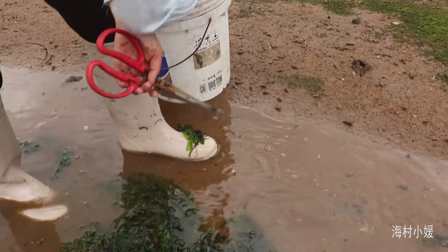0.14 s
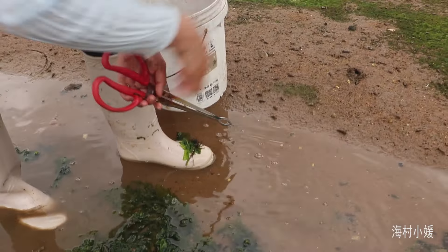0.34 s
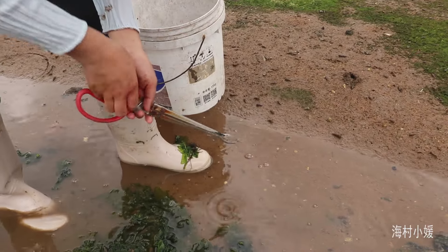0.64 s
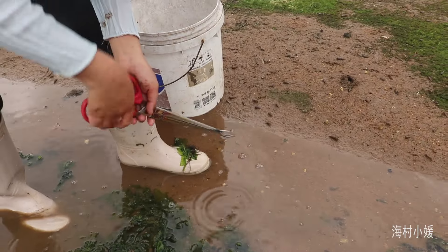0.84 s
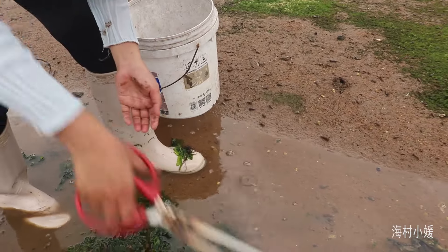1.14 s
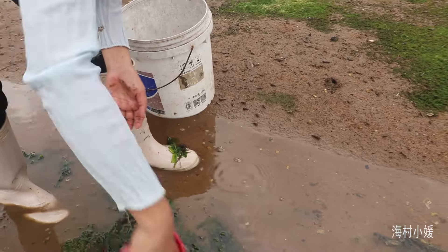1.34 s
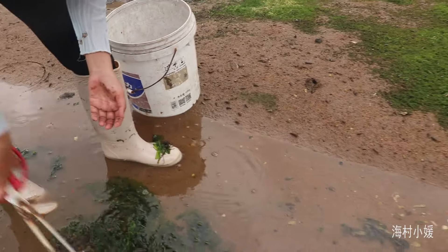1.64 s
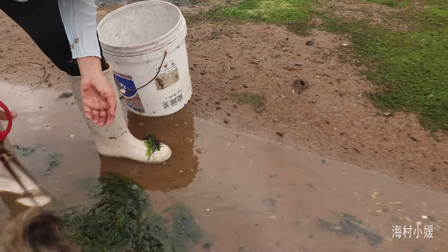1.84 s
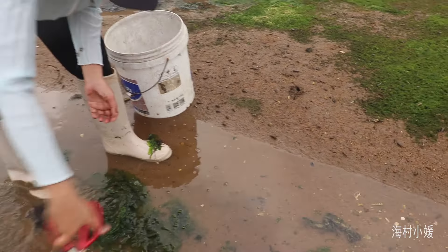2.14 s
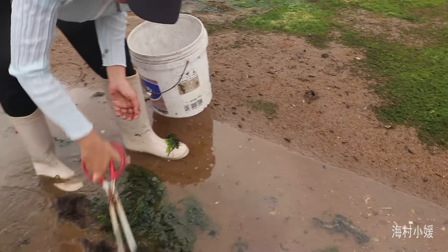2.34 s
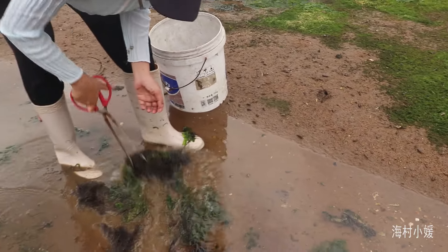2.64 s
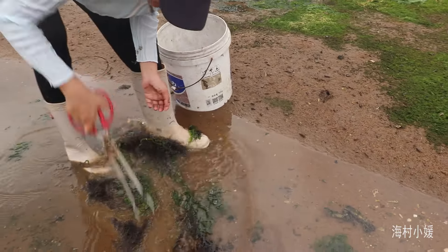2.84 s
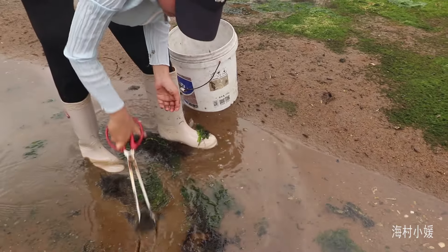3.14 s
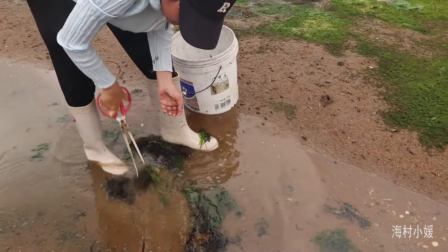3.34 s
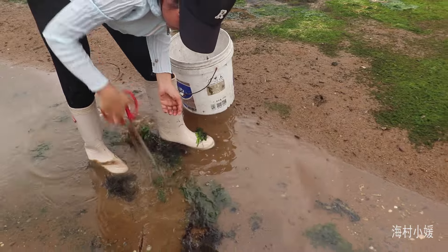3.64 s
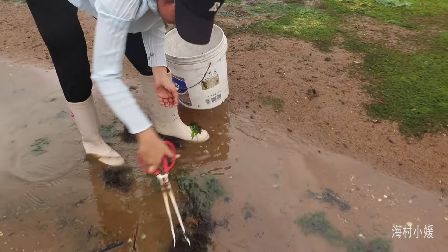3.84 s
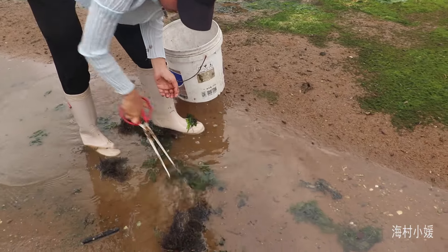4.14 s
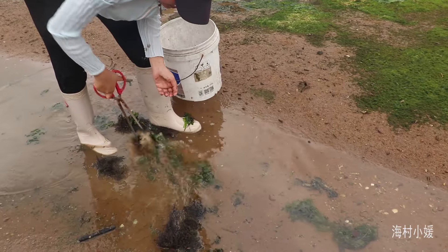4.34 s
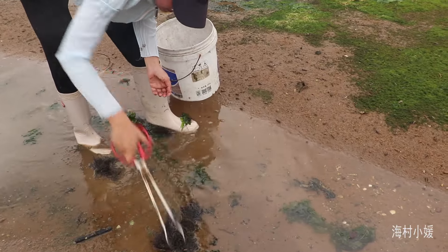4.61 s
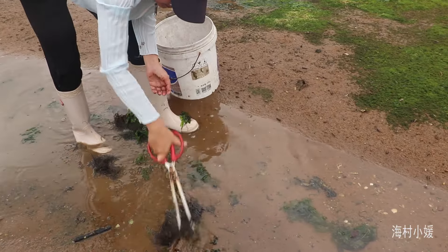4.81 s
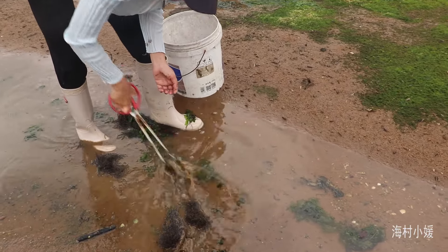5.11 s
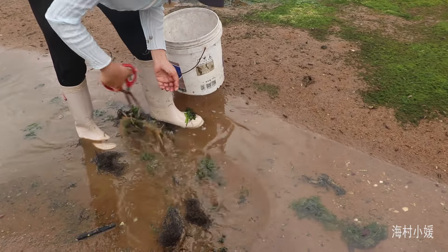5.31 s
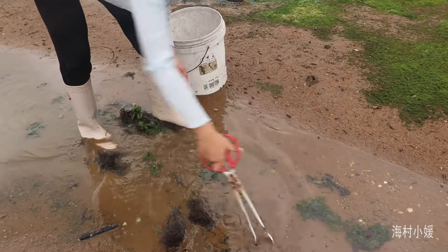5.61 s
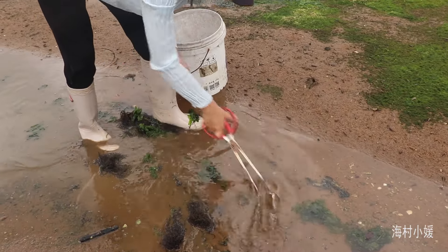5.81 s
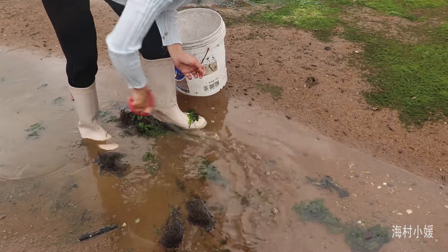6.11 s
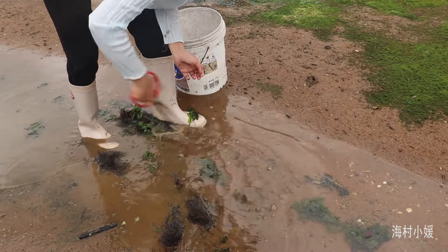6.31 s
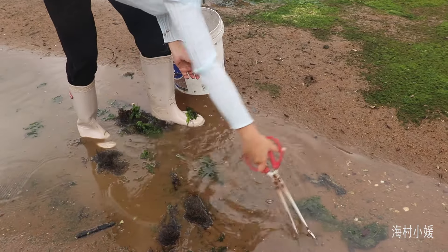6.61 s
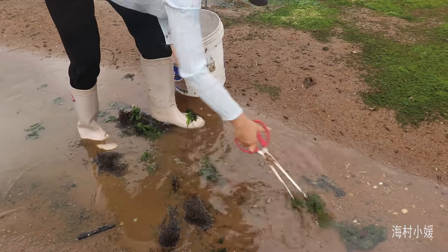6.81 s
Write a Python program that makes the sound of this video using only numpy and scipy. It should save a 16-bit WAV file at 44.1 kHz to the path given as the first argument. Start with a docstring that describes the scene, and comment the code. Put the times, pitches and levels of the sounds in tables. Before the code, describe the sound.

Hollow plastic knocks and a sharp metal clatter, then repeated watery swishes with bubbles, drips and fine spray over faint surf and thudding wind.

```python
"""Steel tongs rake seaweed through a shallow puddle on a tidal flat, stroke after stroke: crowds of gliding tones
make the bubbles, filtered noise the rush, bursts of clicks the spray, and a ringing tone the dragged steel.
Single bubbles and drips stand out. Before the raking, small shells knock a plastic bucket and the tongs clack:
short noise bursts set fixed tones ringing. Behind it lie far surf and a light wind thudding on the microphone,
both made of shaped noise."""
import sys
import numpy as np
from scipy import signal
from scipy.fft import rfft, irfft
from scipy.io import wavfile

SR = 44100
rng = np.random.default_rng(int(sys.argv[2]) if len(sys.argv) > 2 else 0)


def wrap_up_sound(samples):
    """Save the sound to the file named by the first command line argument, as 16-bit audio."""
    columns = np.atleast_2d(samples).T
    # keep every value between -1 and 1, then stretch to whole-number steps
    tamed = np.clip(columns, -1, 1)
    steps = np.round(tamed * 32767).astype(np.int16)
    wavfile.write(sys.argv[1], SR, steps)


N = 306936   # length in samples
HZ = np.maximum(np.fft.rfftfreq(N, 1 / SR), 1)   # frequencies of the whole-scene spectrum

# Levels in the tables are relative: each source trims them further.
# Tone of the far surf: (frequency [Hz], gain [dB])
SURF_COLOUR = [(120, -22), (200, -5.5), (366, -0.5), (1710, -5), (4520, -9), (11700, -12.5), (15100, -20),
               (16000, -10)]
SURF_DB = -51
# Strength of the wind on the microphone: (time [s], level [dB])
WIND_LEVEL = [(0.0, -49.5), (0.62, -46.5), (1.29, -53), (1.4, -42.5), (2.06, -41), (2.28, -49.5),
              (2.39, -38.5), (2.5, -65.5), (2.67, -42.5), (3.1, -65.5), (3.33, -50.5), (3.86, -52.5),
              (3.96, -46), (4.74, -46), (4.9, -36), (5.03, -58), (5.25, -51), (5.38, -62), (5.49, -46),
              (5.8, -56.5), (6.11, -42.5), (6.19, -52.5), (6.96, -51.5)]
# Tone of the wind: (frequency [Hz], gain [dB])
WIND_COLOUR = [(15, -47), (25, -21.5), (91, 1), (167, -1), (240, -5), (430, -19), (518, -24.5), (600, -25),
               (780, -56), (1320, -120)]
# Shells hitting the bucket: (time [s], level [dB], brightness [dB], depth [dB])
SHELL_HITS = [(0.074, 1, -9, -5), (0.079, -10, -0.5, 14.5), (0.108, -6, -6.5, -11),
              (0.157, -5.5, -0.5, -11), (0.162, -7.5, -15, 5), (0.167, -16, 5, 22), (0.2, -7, 2.5, -29),
              (0.215, -5, -4.5, 4.5), (0.23, -12.5, -12, 17), (0.271, -16, -12, 11.5),
              (0.36, -24, -14, 15.5), (0.396, -29.5, 0, 12), (0.436, -20, -11, 5), (0.477, -21.5, -17, 8),
              (0.693, -30.5, 11.5, -15), (0.797, -29.5, -8, 16), (0.83, -26, -16, 11), (1.335, -22, -14, 8),
              (1.347, -28.5, -4, -10), (1.361, -29, -13, 9)]
# Tones the bucket wall rings with: (frequency [Hz], level [dB], time to fade by 60 dB [s])
BUCKET_MODES = [(238, -17, 0.15), (506, -6.5, 0.07), (790, -7.5, 0.18), (1063, -13, 0.11),
                (1350, 0.5, 0.021), (1560, 6, 0.025), (1814, 2.5, 0.017), (2554, -3, 0.028),
                (2870, -11, 0.027), (4300, -4.5, 0.0058)]
# Shells sliding along the bucket floor: (time [s], level [dB])
SHELL_SLIDE = [(0.495, -54), (0.53, -36.5), (0.6, -39.5), (0.66, -41.5), (0.67, -48)]
# Tongs clacking and bouncing: (time [s], level [dB])
TONG_CLACKS = [(0.5619, -18.5), (0.5752, -18), (0.7228, -36), (0.8485, -20), (0.8701, -7.5), (0.8867, -15),
               (0.8977, -18.5), (0.9044, -26), (0.9116, -26.5), (0.9242, -30), (0.929, -26.5),
               (0.9411, -30), (0.9871, -25), (0.9928, -18.5), (0.9954, -18.5), (1.0043, -27),
               (1.2764, -27.5)]
# Tones the tongs ring with: (frequency [Hz], level [dB], time to fade by 60 dB [s])
TONG_MODES = [(2530, -3, 0.014), (6320, 3, 0.019), (7930, 13.5, 0.013), (11630, 1.5, 0.036),
              (13500, 8, 0.0076)]
# Bubbles that stand out: (time when loudest [s], level [dB], pitch when loudest [Hz], length [s],
# upward glide [octaves per s])
SINGLE_BUBBLES = [(3.547, -33, 1470, 0.013, 23), (4.217, -33.5, 1195, 0.009, 1),
                  (4.257, -30, 1380.0, 0.0096, -7.0), (4.381, -26.5, 882, 0.0089, -1),
                  (4.449, -30, 1460.0, 0.008, -4), (4.532, -40, 835, 0.013, 10.0),
                  (4.541, -32.5, 1386, 0.02, 20), (5.024, -29.5, 2050, 0.016, -5),
                  (5.22, -28, 1530.0, 0.0071, -8), (5.253, -31, 2550, 0.027, 7.5),
                  (5.81, -33, 2700, 0.0088, 11), (5.844, -26.5, 1375, 0.012, -31),
                  (5.939, -31, 930, 0.008, 8.0), (6.031, -19.0, 2580, 0.015, 2.5),
                  (6.104, -33, 1030, 0.022, 13), (6.159, -34, 2590, 0.019, -6.5),
                  (6.204, -25, 1250, 0.014, 15), (6.261, -27.5, 1014, 0.0096, 17),
                  (6.28, -34, 1220, 0.018, -4), (6.825, -34.0, 1860, 0.005, -9.0),
                  (6.831, -36, 1440, 0.015, -8)]
# Drips and slaps on the surface: (start time [s], level [dB], plop pitch when loudest [Hz])
DRIPS = [(1.654, -18, 2460), (1.766, -22, 1720), (1.844, -20.5, 1430), (2.195, -23, 2300),
         (2.583, -15.5, 2000), (2.638, -13, 2440), (2.671, -23, 1090), (2.797, -24.5, 1090),
         (3.419, -25, 960), (3.712, -15, 1220), (4.017, -24, 3450), (4.301, -28.5, 1470),
         (4.337, -22, 2560), (4.4, -18, 2570), (4.474, -18, 3800), (4.522, -23, 850), (4.936, -11, 3520),
         (5.099, -11.5, 1280), (5.151, -18, 1400), (5.281, -10.5, 1520), (5.344, -16.5, 1610),
         (5.367, -20, 3080), (5.395, -17, 2200), (5.403, -22, 2330), (5.461, -20, 2300), (5.48, -19, 3230),
         (5.494, -21.5, 1630), (5.523, -26, 1690), (5.81, -25, 2870), (5.996, -17, 3900),
         (6.713, -13, 3550), (6.821, -27, 1440)]
# Raking strokes: (time [s], fizz level [dB], bubbling above fizz [dB], spray above fizz [dB])
RAKE_STROKES = [(1.392, -86, 10, -5), (1.422, -37, -26, 9.5), (1.442, -43, -5, -2),
                (1.512, -36, -14.5, 5.5), (1.871, -42.5, 2.5, 2), (1.901, -59.5, 7.5, 9),
                (2.03, -42, -3.5, 7.5), (2.05, -46, -3, 4), (2.16, -49.5, -7, 5.5), (2.2, -35.5, -20, -3),
                (2.24, -55, 2, 13.5), (2.31, -30, -11.5, 1), (2.33, -42, -2.5, 3.5), (2.539, -37, -2.5, -2),
                (2.679, -43, 8.5, 0.5), (2.988, -57.5, 2, 2), (2.998, -49.5, 0, 9), (3.048, -49, -9, 0),
                (3.088, -44.5, -5.5, 7), (3.228, -27, -15.5, -1.5), (3.567, -44, 6.5, 3.5),
                (3.677, -42, -8, -5), (3.717, -40, 7, 7), (3.816, -61.5, -8, -9), (3.916, -66, -9, -1),
                (3.936, -46.5, -17, 9.5), (3.976, -62, -4, 10), (4.016, -29, -30, -3),
                (4.066, -29.5, -7, 0), (4.405, -43.5, -3, 9), (4.425, -51, 8, 3), (4.525, -39, 4, -5),
                (4.615, -53, -1, 2.5), (4.684, -49, -25, 4.5), (4.704, -75, -4, 2), (4.764, -68, -6, 12),
                (4.814, -35, -31, -3), (4.834, -53, -15, -4), (4.854, -41, -10, 6),
                (4.964, -26.5, -13.5, 1.5), (5.353, -43, 5, 2), (5.493, -38, -8, 0), (5.562, -65, 3, 2),
                (5.692, -70, -8, 13), (5.712, -51.5, 3.5, 18.5), (5.762, -63, 6, 10), (5.802, -30, -3, 0),
                (6.011, -31.5, -7, 6), (6.071, -35, -3.5, 3.5), (6.251, -30.5, -8, 6.5), (6.39, -52, 7, 3),
                (6.49, -50, 0, 10), (6.5, -75, -3, 1), (6.66, -76, 0, 9), (6.71, -36, -4, 3.5),
                (6.75, -61, -10, 3), (6.77, -38.5, -9, 1.5), (6.829, -36, 5, 5), (6.869, -46.5, 4, 6.5),
                (6.959, -39, -5, 2.5)]
# Singing of the steel while its tips drag on sand: (time [s], level above spray [dB])
STEEL_DRAG = [(1.4, -7), (1.7, -12), (1.8, 13), (2.0, -8.5), (2.4, 8), (2.9, -8.5), (3.2, 3), (3.7, -8.5),
              (4.2, -4), (5.5, -7.5), (5.85, 5.5), (6.3, -18), (6.9, 1.5)]
# Tone of the stirred water: (frequency [Hz], gain [dB])
WATER_COLOUR = [(180, -52), (300, -35.5), (1320, -9.5), (2360, -9), (2610, -11), (3080, -9.5), (10200, -4),
                (11500, -4), (16000, -5.5)]
# Tone of the water arriving from the other side: (frequency [Hz], gain [dB])
OTHER_SIDE_COLOUR = [(1000, -5), (8000, -1.5)]
# Difference between the two microphones: (frequency [Hz], left minus right [dB])
MIC_BALANCE = [(60, 4.5), (180, -2), (550, 1.5), (1650, -3), (4970, -1), (15000, 3.5)]


def amp(db):
    """Turn decibels into a gain."""
    return 10 ** (np.asarray(db) / 20)


def rms_one(x):
    """Scale a sound so that its average strength (rms) is 1."""
    return x / np.sqrt(np.mean(x ** 2) + 1e-20)


def in_time(rows):
    """Draw straight lines between the rows of a table, giving each column a value at every sample."""
    times, *columns = np.transpose(rows)
    return [np.interp(np.arange(N) / SR, times, column) for column in columns]


def coloured(x, points):
    """Change the tone of a sound by a curve of (frequency [Hz], gain [dB])."""
    hz, db = np.transpose(points)
    gain = amp(np.interp(np.log(HZ), np.log(hz), db))
    return irfft(rfft(x) * gain, N)


def band(x, low_hz, high_hz):
    """Keep only the sound between two frequencies."""
    edges = [low_hz, min(high_hz, .45 * SR)]
    return signal.sosfilt(signal.butter(2, edges, "band", fs=SR, output="sos"), x + 1e-18)


def drift(rate_hz):
    """Make a slow random wander of rms 1 by smoothing noise; a higher rate wanders faster."""
    r = np.exp(-16 * np.pi * rate_hz / SR)   # worked out at every 8th sample only
    noise = rng.standard_normal(N // 8 + 4002)
    slow = signal.lfilter([1], [1, -2 * r, r * r], noise)[4000:]   # skip the settling-in
    return np.interp(np.arange(N) / 8, np.arange(len(slow)), rms_one(slow))


def ring(push, hz, t60):
    """A resonance: a click of height 1 starts a sine of height 1 that fades by 60 dB in t60 seconds."""
    r = amp(-60 / (t60 * SR))
    w = 2 * np.pi * hz / SR
    return signal.lfilter([0, np.sin(w)], [1, -2 * r * np.cos(w), r * r], push + 1e-18)


def laid(times, grains):
    """Add up short sounds (one row each), each starting at its own time."""
    at = (np.asarray(times) * SR).astype(int)[:, None] + np.arange(grains.shape[1])
    return np.bincount(at.ravel(), grains.ravel(), N + grains.shape[1])[:N]


def puffs(db, t60, size):
    """Noise bursts with a sharp start that fade by 60 dB per t60 seconds, cut after size samples."""
    t = np.arange(size) / SR
    return rng.standard_normal((len(db), size)) * amp(db[:, None] - 60 * t / t60)


def chirps(db, hz, length, rise, size):
    """Bubbles: sines that swell, die and glide as they near the surface; loudest after half their length."""
    t = np.arange(size) / SR
    top = length[:, None] / 2
    octaves = rise[:, None] * np.minimum(t - top, 3 * top)
    phase = 2 * np.pi * np.cumsum(hz[:, None] * 2 ** octaves, axis=1) / SR
    swell = (t / top * np.exp(1 - t / top)) ** 2
    return np.sin(phase) * amp(db)[:, None] * swell


def pair(x, lag_s, pan_db):
    """Sound reaches the right microphone lag_s later (earlier if negative); positive pan_db favours the left."""
    later = irfft(rfft(x) * np.exp(-2j * np.pi * HZ * lag_s), N)
    return np.array([x * amp(pan_db / 2), later * amp(-pan_db / 2)])


def shore(lag_s):
    """Far surf: steady shaped noise, one part shared by both microphones and one part of each one's own."""
    shared, *own = [rms_one(coloured(noise, SURF_COLOUR)) for noise in rng.standard_normal((3, N))]
    return amp(SURF_DB) * (pair(shared, lag_s, 0) + np.array(own))


def wind():
    """Wind: low, lumpy turbulence, partly shared and partly each microphone's own."""
    shared, left, right = (rms_one(coloured(rng.standard_normal(N), WIND_COLOUR)) for _ in range(3))
    lumps = amp(4.8 * drift(28.7))
    level = amp(in_time(WIND_LEVEL)[0] - 4)
    return level * lumps * np.array([shared + 0.84 * left, shared + 1.33 * right])


def shell_slide():
    """Shells sliding: flickering noise that rubs the bucket floor."""
    t = np.arange(N) / SR
    sliding = (t > SHELL_SLIDE[0][0]) * (t < SHELL_SLIDE[-1][0])
    level = amp(in_time(SHELL_SLIDE)[0] - 23.5 + 3.2 * drift(42))
    return level * rng.standard_normal(N) * sliding


def bucket():
    """Shells knock the wall: short rattling contacts set its tones ringing, with a crack and a dull rattle."""
    times, db, bright_db, deep_db = np.transpose(SHELL_HITS)
    slide = shell_slide()
    knock = band(laid(times, puffs(db + 5, 0.024, size=900)), 540, 2120)
    crack = band(laid(times, puffs(db + bright_db - 8.5, 0.044, size=1500)), 2600, 11000)
    rattle = band(laid(times, puffs(db + deep_db / 2 - 13, 0.28, size=4000)), 320, 1480)
    out = knock + crack + rattle
    for hz, mode_db, t60 in BUCKET_MODES:
        lean_db = deep_db * np.log2(1500 / hz) / 2.47   # a dull blow favours the low tones
        chance_db = rng.normal(0, 3, len(times))
        contact = laid(times, puffs(db + lean_db - 25.5 + chance_db, 0.0058, size=400))
        push = band(contact, hz / 2, hz * 2) + slide * (hz > 900)   # sliding stirs only the higher tones
        out += amp(mode_db) * ring(push, hz, t60)
    return out


def tongs():
    """Steel on steel: a bright crack of noise and short high rings."""
    times, db = np.transpose(TONG_CLACKS)
    out = band(laid(times, puffs(db - 5.5, 0.035, size=1200)), 3700, 19000)
    for hz, mode_db, t60 in TONG_MODES:
        chance_db = rng.normal(0, 4, len(times))
        contact = laid(times, puffs(db + mode_db - 26 + chance_db, 0.0045, size=150))
        out += ring(contact, hz, t60)
    return out


def splashes():
    """Bubbles and drips that stand out; a drip is a plop of a few cycles with a spray of noise."""
    times, db, hz, length, rise = np.transpose(SINGLE_BUBBLES)
    bubbles = laid(times - length / 2, chirps(db + 2, hz, length, rise, size=2600))
    times, db, hz = np.transpose(DRIPS)
    plops = laid(times, chirps(db - 5, hz, 4 / hz, np.full(len(hz), 40), size=700))
    drip_spray = band(laid(times, puffs(db - 4.5, 0.028, size=1200)), 920, 6000)
    return bubbles + plops + drip_spray


def gurgle(per_s, low_hz, high_hz, cycles, rush_db, size):
    """A crowd of bubbles of random size, most gliding upward, on patchy rushing noise."""
    start, pitch, stretch, loud, glide = rng.random((int(per_s * N / SR), 5)).T
    hz = low_hz * (high_hz / low_hz) ** pitch
    length = cycles / hz * (0.27 + stretch ** 2)
    db = -4 * np.log(np.maximum(loud, .03))   # a few bubbles are much louder than the rest
    crowd = laid(start * N / SR, chirps(db, hz, length, 28 * (glide - .35), size))
    rush = band(rng.standard_normal(N), low_hz, high_hz) * amp(5.8 * drift(24))
    return rms_one(coloured(rms_one(crowd) + amp(rush_db) * rms_one(rush), WATER_COLOUR))


def spray(per_s, cycles, patchy_db):
    """Countless tiny droplets burst in clumps: random clicks shared out among short treble resonances."""
    sizes = amp(4.5 * np.minimum(rng.exponential(1, N), 4)) * rng.choice([-1, 1], N)
    born = rng.random(N) < per_s * amp(4 * drift(25)) / SR   # the drift makes the clumps
    dealt = rng.integers(0, 12, N)   # which resonance each droplet sounds
    pops = np.zeros(N)
    for k, hz in enumerate(np.geomspace(6000, 17000, 12)):
        pops += ring(sizes * born * (dealt == k), hz, cycles / hz) * np.sqrt(hz)
    return rms_one(coloured(pops, WATER_COLOUR) * amp(patchy_db * drift(7.2)))


def dragged_steel():
    """Tips dragging on sand: flickering noise keeps one high tone of the tongs ringing."""
    scrape = rng.standard_normal(N) * amp(3.8 * drift(32))
    return amp(in_time(STEEL_DRAG)[0]) * rms_one(ring(scrape, TONG_MODES[3][0], 0.009))


def puddle():
    """The raked water: coarse bubbling, fizz, fine spray and the singing steel follow the strokes."""
    fizz_db, bubbling_db, spray_db = in_time(RAKE_STROKES)
    raking = np.arange(N) > RAKE_STROKES[0][0] * SR   # silent before the first stroke
    slosh = amp(2.6 * drift(32))   # all layers surge together
    bubbling = amp(bubbling_db) * gurgle(330, 380.5, 2598, cycles=19.2, rush_db=-5.5, size=1700)
    fizz = gurgle(1500, 2406, 5390, cycles=22.2, rush_db=-3.5, size=500)
    treble = amp(spray_db) * (spray(6000, cycles=13.4, patchy_db=1.26) + dragged_steel())
    return (bubbling + fizz + treble) * amp(fizz_db - 3) * slosh * raking


def scene():
    """All sources at the two microphones; the puddle is wide, so part of it arrives from the other side."""
    lag_s = .000042   # the right microphone hears the near water and surf this much later
    background = shore(lag_s) + wind()
    knocks = pair(bucket(), .00003, -1.0) + pair(tongs(), .000025, -1.2)
    near_water = pair(puddle() + splashes(), lag_s, 0.13)
    far_water = pair(coloured(puddle(), OTHER_SIDE_COLOUR), -.000023, -0.37)
    return background + knocks + near_water + far_water


def record(dry):
    """The two microphones differ in tone; peaks are rounded off and the top treble is cut."""
    lean = np.array(MIC_BALANCE) * [1, .5]   # half the difference goes to each side
    x = np.array([coloured(dry[0], lean), coloured(dry[1], lean * [1, -1])])
    rounded = 1.41 * np.tanh(x / 1.605)
    treble_cut = signal.cheby2(14, 60, 16200, fs=SR, output="sos")   # 60 dB down from 16200 Hz up
    return signal.sosfilt(treble_cut, rounded)


dry = scene()
out = record(dry)
wrap_up_sound(out)
```